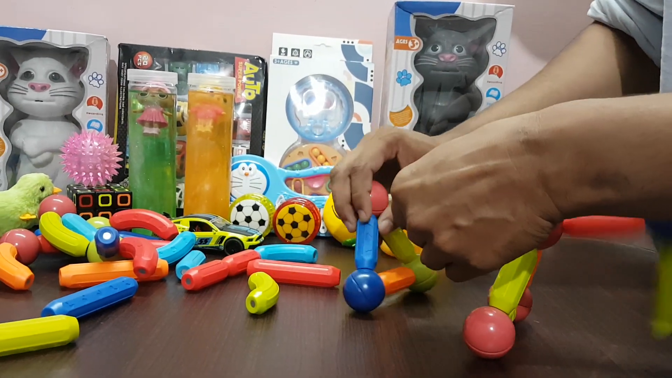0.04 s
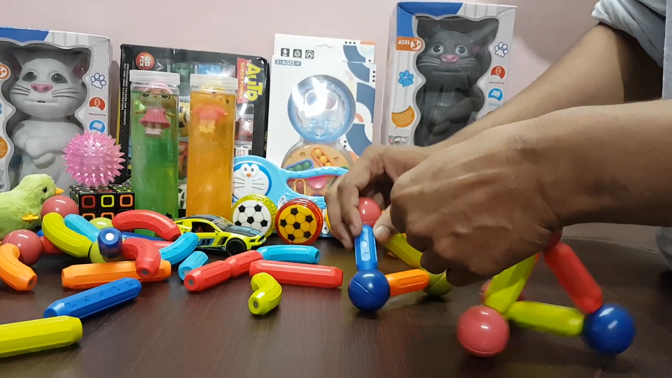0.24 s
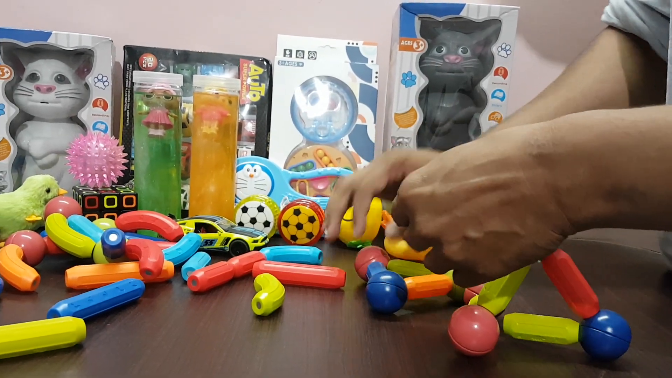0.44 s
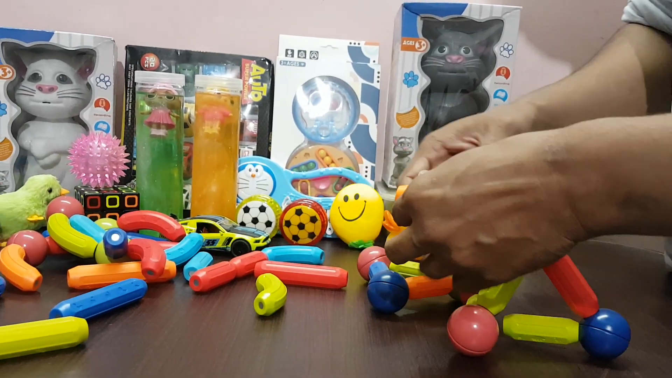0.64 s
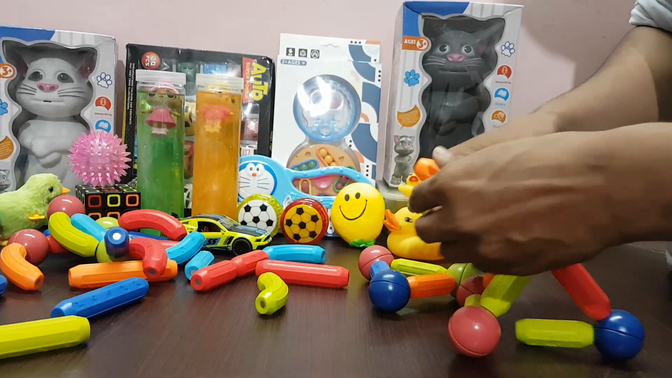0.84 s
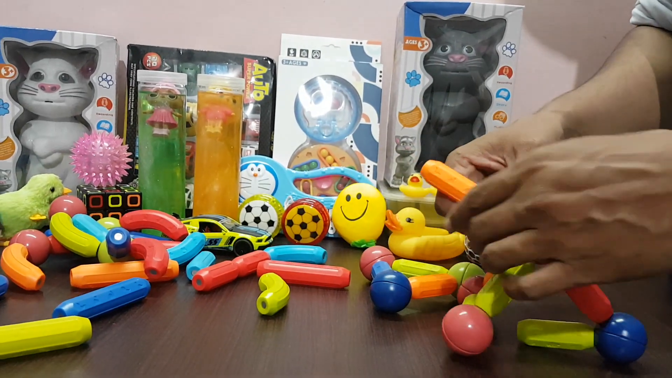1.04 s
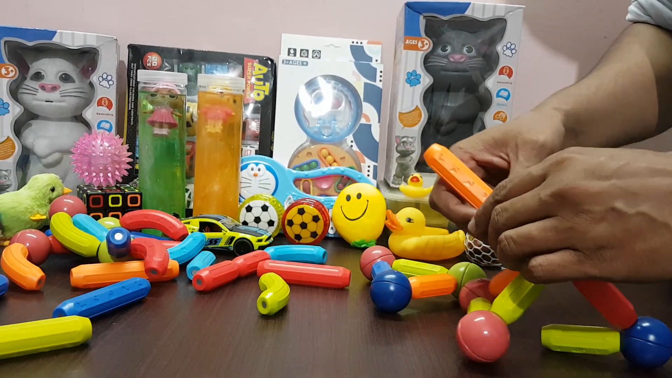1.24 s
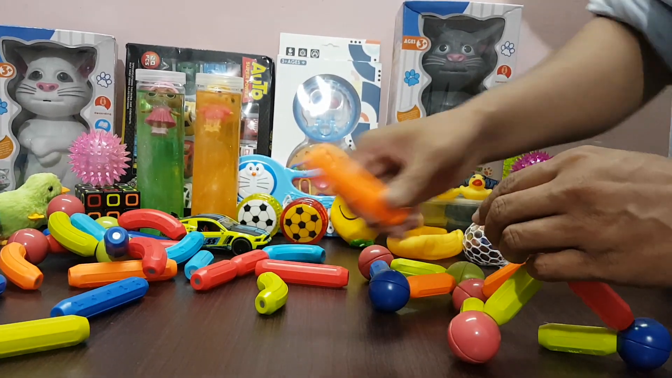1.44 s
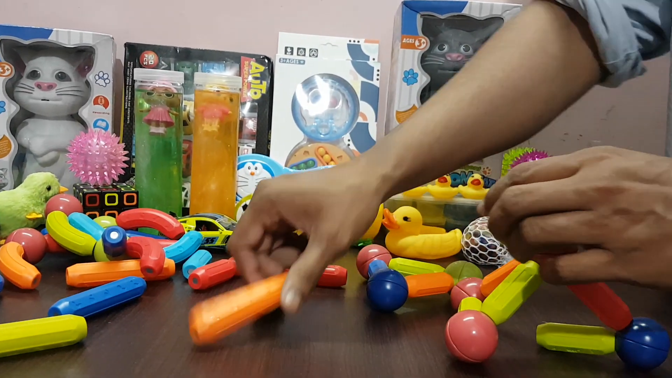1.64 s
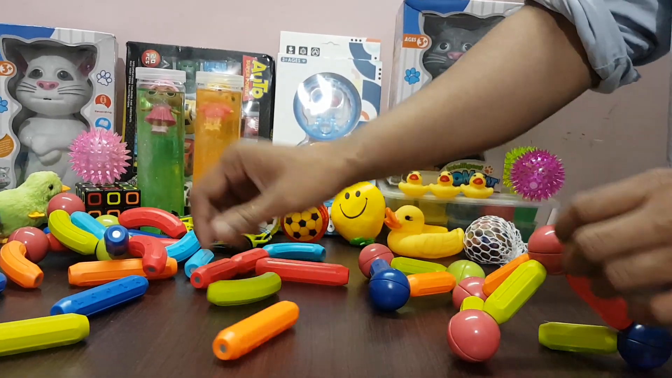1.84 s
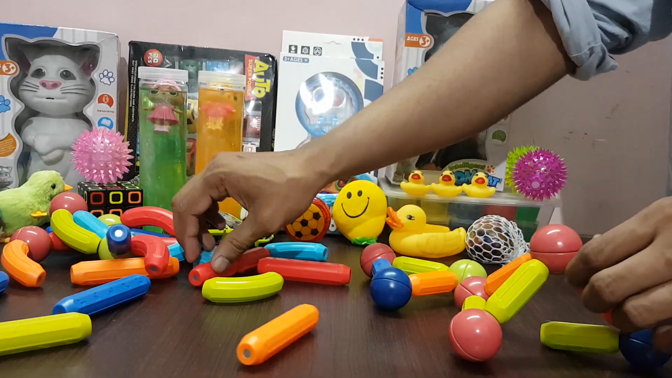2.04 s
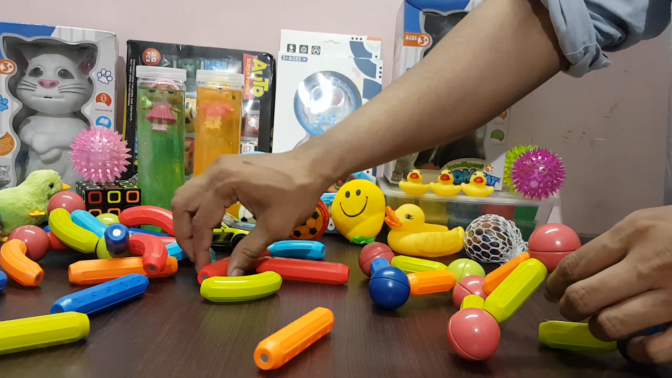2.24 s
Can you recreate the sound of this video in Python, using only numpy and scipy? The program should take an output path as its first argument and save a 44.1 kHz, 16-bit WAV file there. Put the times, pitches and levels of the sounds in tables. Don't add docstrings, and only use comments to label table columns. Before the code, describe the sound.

Plastic toy pieces with magnets inside knock sharply on a tabletop, then bounce, slide and settle

```python
import sys
import numpy as np
from scipy import signal
from scipy.fft import rfft, irfft
from scipy.io import wavfile
from scipy.ndimage import uniform_filter1d

SR = 44100
rng = np.random.default_rng(int(sys.argv[2]) if len(sys.argv) > 2 else 0)


def bounce(signal):
    frames = np.transpose(np.atleast_2d(signal))
    limited = np.clip(frames, -1, 1)
    pcm = np.round(limited * 32767).astype(np.int16)
    wavfile.write(sys.argv[1], SR, pcm)


def convert_level_to_amplitude(level_db):
    exponent = np.asarray(level_db, float) / 20
    return 10 ** exponent


N = 101430

# (left minus right dB, left lag ms)
BALL_AT, TOWER_AT, STICK_AT = (-2.6, .14), (-1.8, .12), (-.3, -.14)
HEAP_AT, HAND_AT = (-3.2, -.13), (-3., .08)


def evened(x):
    return x / np.sqrt(np.mean(x ** 2) + 1e-20)


def read(points, hz):
    f, value = np.transpose(points)
    return np.interp(np.log(hz + 1), np.log(f + 1), value)


def add(mix, start_s, sound):
    part = mix[round(start_s * SR):][:len(sound)]
    part += sound[:len(part)]


def wander(top_hz):
    t = np.arange(N) / SR
    rates_hz = np.geomspace(.4, top_hz, num=20)
    return evened(sum(np.sin(2 * np.pi * (f * t + rng.random())) / np.sqrt(f) for f in rates_hz))


def placed(x, pan_db, lag_ms):
    side = np.array([[.5], [-.5]])
    turn = np.exp(-2j * np.pi * np.fft.rfftfreq(N, 1 / SR) * side * lag_ms / 1000)
    return irfft(rfft(x) * turn, N) * convert_level_to_amplitude(pan_db * side)


def hum():
    # pitch_hz, level_db (rms)
    lines = [(100, -60), (200, -67)]
    out = np.zeros(N)
    for pitch_hz, level_db in lines:
        level = np.sqrt(2) * convert_level_to_amplitude(level_db + 1.3 * wander(2.0))
        out += level * np.sin(2 * np.pi * np.cumsum(pitch_hz + 1.5 * wander(3)) / SR)
    return out


def air():
    # pitch_hz, level_db (per Hz)
    spectrum = [(40, -16), (90, -0.5), (250, -11), (700, -15), (2000, -22.5), (7000, -31.5), (10000, -40.5),
                (15500, -34.5)]
    # pitch_hz, likeness (0-1)
    likeness = [(60, 0.9), (300, 0.45), (1000, 0.34), (4000, 0.14), (12000, 0.14)]
    frames, hz = N // 256 + 5, np.fft.rfftfreq(1024, 1 / SR)
    a, b, c, d, patches = rng.standard_normal((frames, 513, 5)).T
    patches = uniform_filter1d(patches, size=12, axis=0)
    patches = evened(uniform_filter1d(patches, size=14, axis=1))
    same = read(likeness, hz)[:, None]
    left, other = a + 1j * b, c + 1j * d
    z = np.array([left, same * left + np.sqrt(1 - same ** 2) * other])
    z = z * convert_level_to_amplitude(read(spectrum, hz)[:, None] + 4.5 * patches)
    wash = evened(signal.istft(z, nperseg=1024, noverlap=768)[1][:, :N])
    wash = wash * convert_level_to_amplitude(-46.5 - 13.5 + 0.4 * wander(6.7))
    return (wash + hum()) * convert_level_to_amplitude([[-1.1], [1.1]])


def room(x):
    # pitch_hz, t60_s
    decay = [(60, 0.12), (110, 0.73), (300, 0.25), (1000, 0.23), (3000, 0.18), (8000, 0.26), (15000, 0.2)]
    # pitch_hz, level_db
    colour = [(55, -6), (105, 6), (300, 3), (700, 5), (2000, 3.5), (6000, -2), (14000, -7)]
    # pitch_hz, likeness (0-1)
    likeness = [(100, 1), (400, 0.83), (1500, 0.043), (6000, 0.12), (14000, 0.11)]
    level_db, gap_s, size = -6.5, 0.0039, SR // 2
    tap_s = np.arange(size) / SR
    taps = np.zeros((2, size))
    at = np.arange(0, size - 16, 16) + rng.integers(0, 16, (2, (size - 1) // 16))
    np.put_along_axis(taps, at, rng.choice([-1., 1.], at.shape), 1)
    hz, t, (a, b) = signal.stft(taps * (tap_s > gap_s), SR, nperseg=256)
    same = read(likeness, hz)[:, None]
    z = np.array([a, same * a + np.sqrt(1 - same ** 2) * b])
    z = z * convert_level_to_amplitude(-60 * t / read(decay, hz)[:, None])
    z = rfft(signal.istft(z, SR, nperseg=256)[1], SR)
    flat = z / np.sqrt(uniform_filter1d(abs(z) ** 2, size=30, axis=1))
    tail = irfft(flat * convert_level_to_amplitude(read(colour, np.arange(size + 1))), SR)[:, :size]
    tail = tail * np.clip(tap_s / gap_s, 0, 1) ** 2
    return convert_level_to_amplitude(level_db) * signal.fftconvolve(x, tail / np.linalg.norm(tail[0]), axes=1)[:, :N]


def slides():
    # start_s, length_s, level_db, centre_hz, peak_share (of the length)
    strokes = [(0, 0.4, -49, 269, 0.042), (0, 0.39, -58.5, 656, 0.073), (0.584, 0.25, -58.5, 583, 0.33),
               (0.708, 0.5, -59, 326, 0.3), (0.83, 0.12, -54.5, 900, 0.86), (1.161, 0.15, -53, 720, 0.14),
               (1.176, 0.24, -51.5, 325, 0.036), (1.442, 0.022, -59, 339, 0.52),
               (1.833, 0.21, -48, 710, 0.087), (2.066, 0.061, -41.5, 1060, 0.4),
               (2.07, 0.092, -63, 6400, .3), (2.252, 0.057, -41, 980, 0.52), (1.06, 0.043, -58, 470, 0.67)]
    slips_per_s, grit_db, hiss_db, broad_hz = 1200, -2.5, -15.5, 900
    out = np.zeros(N)
    slips = convert_level_to_amplitude(grit_db * np.minimum(rng.exponential(1, N), 4))
    slips = slips * (rng.random(N) < slips_per_s / SR) * rng.choice([-1, 1], N)
    for start_s, length_s, level_db, centre_hz, peak_share in strokes:
        u = np.arange(0, length_s, 1 / SR) / length_s
        x = slips[round(start_s * SR):][:len(u)]
        width_hz = centre_hz * min(1, centre_hz / broad_hz)
        r = np.exp(-np.pi * width_hz / SR)
        poles = [1, -2 * r * np.cos(2 * np.pi * centre_hz / SR), r * r]
        body = evened(signal.lfilter([1, -1], poles, x))
        body = evened(signal.lfilter([1], [1, -.8], body)) + convert_level_to_amplitude(hiss_db) * body
        bend = np.log(.5) / np.log(np.clip(peak_share, .05, .95))
        add(out, start_s, convert_level_to_amplitude(level_db) * body * np.sin(np.pi * u ** bend)[:len(x)])
    return placed(out, *HAND_AT)


def rocking():
    # pitch_hz, level_db, t60_s
    modes = [(3520, 0, .012), (6420, -3, .02), (7700, -9, .014)]
    start_s, length_s, level_db, fade_db = 1.831, .24, -38, -26
    taps_per_s, gust_db, sag_share = 600, 3, .1
    u, out = np.arange(0, length_s, 1 / SR) / length_s, np.zeros(N)
    taps = rng.standard_normal(len(u)) * (rng.random(len(u)) < taps_per_s / SR)
    taps = taps * convert_level_to_amplitude(gust_db * wander(46)[:len(u)])
    chatter = 0
    for k, (pitch_hz, ring_db, t60_s) in enumerate(modes):
        sagging_hz = pitch_hz * (1 - sag_share * u * (k == 0))
        turn = np.exp(2j * np.pi * np.cumsum(sagging_hz) / SR)
        r = convert_level_to_amplitude(-60 / (t60_s * SR))
        ringing = (turn * signal.lfilter([1], [1, -r], taps / turn)).imag
        chatter = chatter + convert_level_to_amplitude(ring_db) * evened(ringing)
    swell = np.minimum(u * 20, 1) * np.sqrt(1 - u)
    add(out, start_s, convert_level_to_amplitude(level_db + fade_db * u) * evened(chatter) * swell)
    return placed(out, *STICK_AT)


def puff(colour, t60_s):
    size, rise_s = 4096, 0.00014
    t = np.arange(size) / SR
    root = np.sqrt(convert_level_to_amplitude(-60 * t / t60_s) * (1 - np.exp(-t / rise_s)))
    gain = convert_level_to_amplitude(read(colour, np.fft.rfftfreq(size, 1 / SR)))
    x = rng.standard_normal(size)
    for _ in range(4):
        envelope = uniform_filter1d(abs(x), size=90)
        z = rfft(x * root / (envelope / np.sqrt(root ** 2 + 1e-9) + 1e-9 * abs(x).max()))
        x = irfft(gain * z / (abs(z) + 1e-12))
    x = x * (t < t60_s) * np.minimum(t * 8000, 1)
    return x / np.linalg.norm(x) * np.sqrt(t60_s * SR / 90)


def ring(modes, rise_s, t60_max_s=np.inf, detune=.012):
    t, spread_db = np.arange(SR // 5) / SR, 1.5
    out = np.zeros(len(t))
    chance = rng.standard_normal((len(modes), 3))
    for (pitch_hz, level_db, t60_s), (a, b, c) in zip(modes, chance):
        level = convert_level_to_amplitude(level_db + spread_db * a - 60 * t / min(t60_s, t60_max_s))
        out += level * np.sin(2 * np.pi * pitch_hz * (1 + detune * b) * t + 3 * c)
    return out * (1 - np.exp(-t / rise_s)) / np.linalg.norm(convert_level_to_amplitude(np.array(modes)[:, 1]))


def knocks(rows, shell, steel, at):
    # pitch_hz, level_db, t60_s
    table = [(68.6, -6, 0.15), (102.1, -6, 0.2), (186.9, -5, 0.11), (257.1, -3, 0.13), (304, 1, 0.095),
             (335.8, -5, 0.1), (412, 1.5, 0.06), (446, -10, 0.25), (554.4, -8.5, 0.15), (606.3, -1.5, 0.11)]
    # pitch_hz, level_db
    tick_colour = [(500, -35.5), (1500, -7.5), (4000, 1), (6500, -4.5), (9500, -7.5), (12500, -3),
                   (16000, -15.5)]
    near, far = np.zeros((2, N))
    colour = [(60, -47.5), (250, -15)] + [row[:2] for row in shell]
    colour = colour + [(2.6 * shell[-1][0], -34), (16000, -50)]
    for start_s, shell_db, table_db, tick_db, steel_db in rows:
        tick = convert_level_to_amplitude(tick_db + 25.0) * puff(tick_colour, 0.0065)
        clack = convert_level_to_amplitude(shell_db - 3) * puff(colour, 0.016)
        rings = convert_level_to_amplitude(shell_db) * ring(shell, 0.0002, t60_max_s=.024)
        rings = rings + convert_level_to_amplitude(steel_db) * ring(steel, 0.00015)
        thud = convert_level_to_amplitude(table_db + 6.5) * ring(table, 0.00055, detune=.003)
        for mix, clack_db, ring_db in (near, 0, 0), (far, 7.5, -6.5):
            add(mix, start_s, tick + convert_level_to_amplitude(clack_db) * clack)
            add(mix, start_s, thud + convert_level_to_amplitude(ring_db) * rings)
    return placed(np.array([[near], [far]]), *at)


def scene():
    # start_s, shell_db, table_db, tick_db, steel_db
    ball_knocks = [
        (.1615, -21.5, -20.5, -28, -45.5),
        (.1628, -4.5, -31.5, -52, -29.5),
    ]
    snap_knocks = [
        (.3114, -18.5, -57, -41, -70.5),
    ]
    drop_knocks = [
        (.3478, -37, -27.5, -28.5, -53),
        (.3490, -13, -47.5, -55.5, -39.5),
        (.3600, -48.5, -42.5, -53, -63.5),
    ]
    tower_knocks = [
        (.4756, -1, -20, -30.5, -72),
        (.4895, -26.5, -36, -69, -47),
        (.4998, -19, -41, -48.5, -59.5),
                    (.5255, -11, -28, -48, -50),
    ]
    hand_knocks = [
        (.925, -50.5, -77, -86, -70),
        (1.163, -40, -56, -85, -50),
        (1.200, -41.5, -71, -86, -68),
        (1.232, -56, -62, -85, -66),
    ]
    hand_ticks = [
        (.723, -52, -80, -74, -66),
        (1.060, -54, -80, -72, -70),
        (1.165, -56, -80, -78, -62),
        (1.185, -56, -80, -78, -53),
        (1.524, -62, -85, -84, -60),
    ]
    stick_knocks = [
        (1.7372, -10.5, -38, -30, -18.5),
        (1.7525, -49, -68, -60.5, -28),
        (1.7875, -22.5, -46.5, -38, -19),
        (1.8035, -29.5, -52, -49.5, -29),
        (1.8082, -18.5, -51.5, -58, -30.5),
        (1.8165, -47, -60, -69.5, -23),
        (1.8325, -22, -43, -34.5, -20),
        (1.8355, -38.5, -71, -52, -19),
        (1.8535, -45, -57, -56, -31),
    ]
    heap_knocks = [
        (2.067, -39.5, -64, -85, -70),
        (2.160, -59, -63, -90, -80),
        (2.175, -53, -49.5, -86, -72),
        (2.2403, -21.5, -44.5, -74, -60),
        (2.2623, -22.5, -54, -80.5, -60),
        (2.2665, -34, -63, -71, -53),
    ]
    nudge_knocks = [
        (2.1045, -27, -57, -71.5, -62),
        (2.1075, -23, -51.5, -46.5, -61),
        (2.2114, -31, -50, -48.5, -72),
        (2.252, -30, -70, -67, -59),
    ]
    # pitch_hz, level_db, t60_s
    ball = [(339, -5, .02), (600, -2, .02), (830, 0, .024), (1150, -2, .022), (1590, -4, .02),
            (2200, -11, .02), (3250, -6, .016), (5200, -17, .01)]
    snapper = [(1050, 0, .011), (1740, -3, .012), (2410, -5, .011), (3420, -9, .011), (5040, -13, .02),
               (6370, -7, .01), (8930, -14, .006)]
    dropped = [(377, -4, .02), (700, -6, .02), (1170, -5, .022), (1550, 0, .017), (2470, -16, .02),
               (3480, -7, .013), (7250, -14, .012)]
    tower = [(645, 0, .02), (850, 2, .022), (1200, 2, .022), (1450, -6, .015), (1830, 1, .02),
             (2700, -11, .018), (3450, -17, .015), (5120, -23, .012)]
    stick = [(578, -4.5, 0.013), (1040, 0, 0.0077), (1573, -2.5, 0.039), (1913, -4, 0.041),
             (2460, -0.5, 0.031), (5310, -32, 0.011), (6560, -28, .015), (8550, -12.5, 0.01)]
    heap = [(728, -0.5, 0.027), (1109, 1.5, 0.035), (1570, 4.5, 0.035), (1783, -3.5, 0.066),
            (2270, -6.5, 0.029), (2940, -8.5, 0.017), (4800, -22, 0.026)]
    nudged = [(1090, -3, .015), (2500, -2.5, 0.025), (3600, -8, 0.008), (4820, -8.5, 0.015),
              (6000, -17.5, .015), (7280, -8.5, 0.0073)]
    # pitch_hz, level_db, t60_s
    stick_steel = [(3480, -15, .02), (7210, -7, .016), (7650, -1, .028), (7800, 0, .03), (8000, -6, .016),
                   (11750, -4, .022), (11950, 0, .025), (12300, -5, .02), (12900, -10, .015)]
    loose = [(3400, -3, .03), (3700, 0, .03), (7300, -5, .02), (7600, -8, .02)]
    toys = knocks(ball_knocks, ball, loose, BALL_AT)
    toys = toys + knocks(snap_knocks, snapper, loose, BALL_AT)
    toys = toys + knocks(drop_knocks, dropped, loose, BALL_AT)
    toys = toys + knocks(tower_knocks, tower, loose, TOWER_AT)
    toys = toys + knocks(stick_knocks, stick, stick_steel, STICK_AT)
    toys = toys + knocks(heap_knocks, heap, loose, HEAP_AT)
    toys = toys + knocks(nudge_knocks, nudged, loose, HEAP_AT)
    toys = toys + knocks(hand_knocks, heap, loose, HAND_AT)
    toys = toys + knocks(hand_ticks, nudged, loose, HAND_AT)
    near, far = toys + slides() + rocking()
    return near + room(far) + air()


def low_pass(x):
    return signal.sosfilt(signal.butter(12, 16820, fs=SR, output="sos"), x)


def record(dry):
    # pitch_hz, level_db
    port_tilt = [(300, 0.6), (3000, -4.5), (7000, -1), (13000, 8.5)]
    band_hz, ceiling = [56.1, 15900], .9
    tilt = convert_level_to_amplitude(np.array([[.5], [-.5]]) * read(port_tilt, np.fft.rfftfreq(N, 1 / SR)))
    band = signal.butter(3, band_hz, "band", fs=SR, output="sos")
    x = signal.sosfilt(band, irfft(rfft(dry) * tilt, N))
    return low_pass(ceiling * np.tanh(x / ceiling))


dry = scene()
out = record(dry)
bounce(out)
```